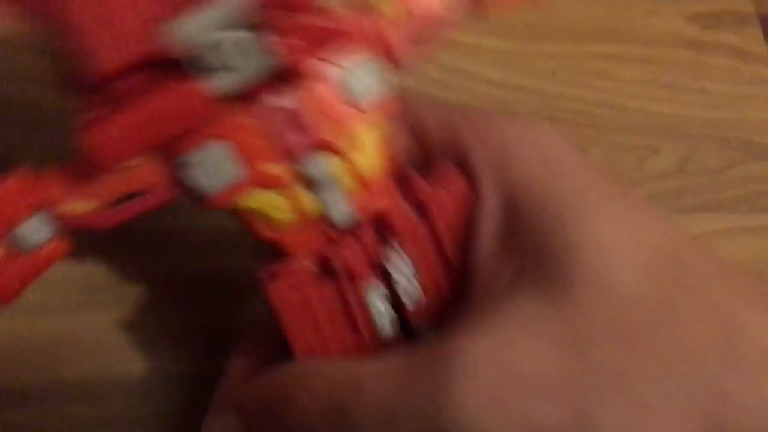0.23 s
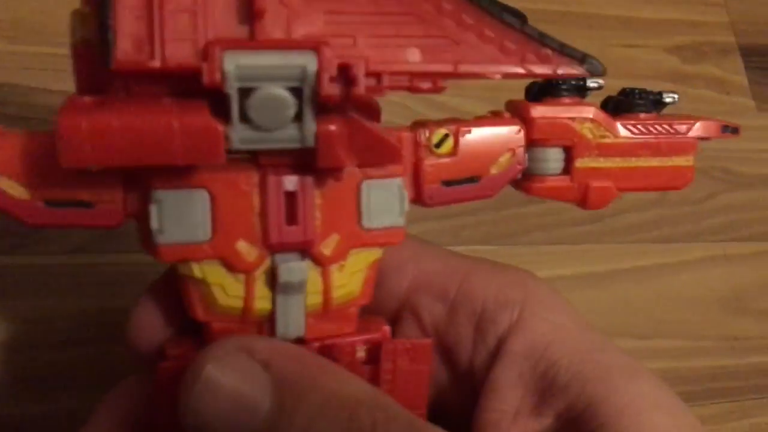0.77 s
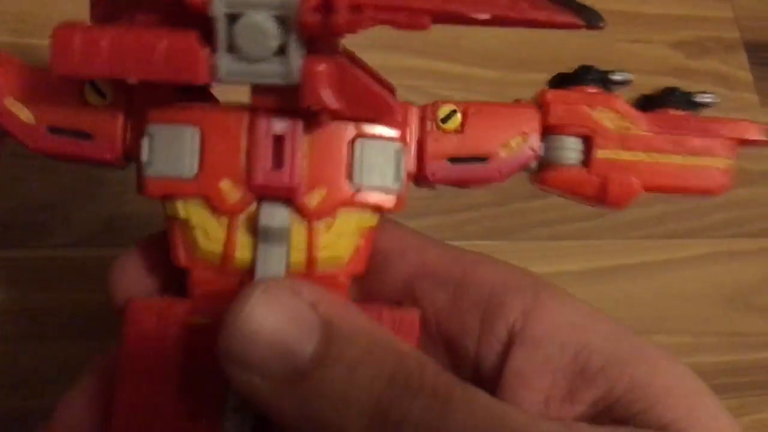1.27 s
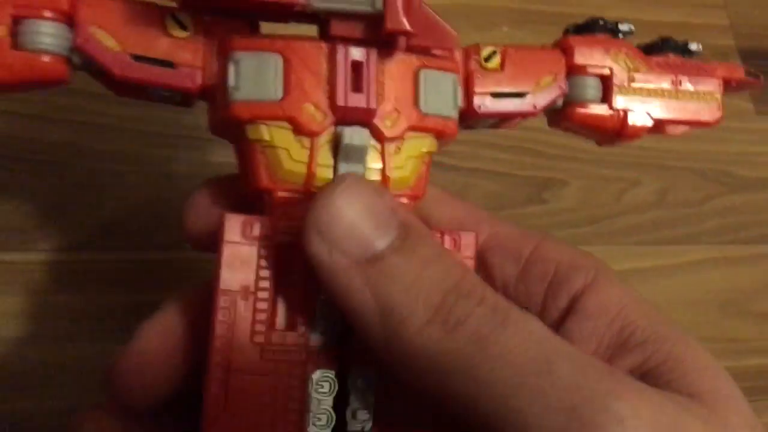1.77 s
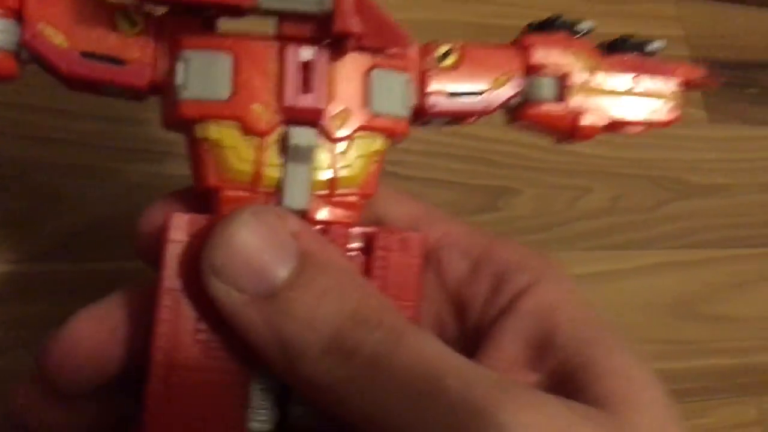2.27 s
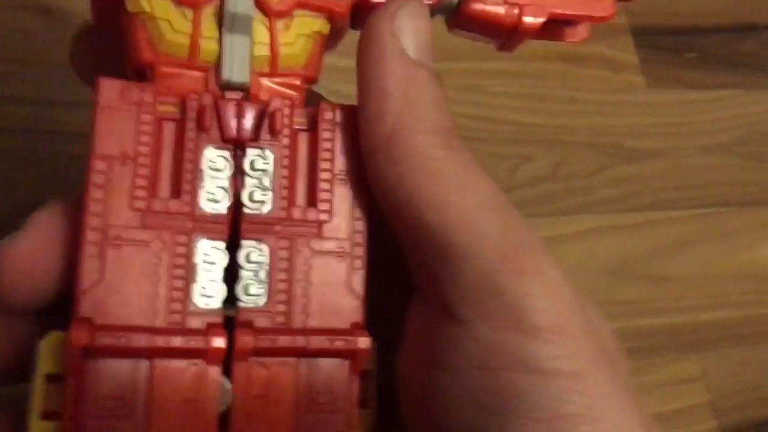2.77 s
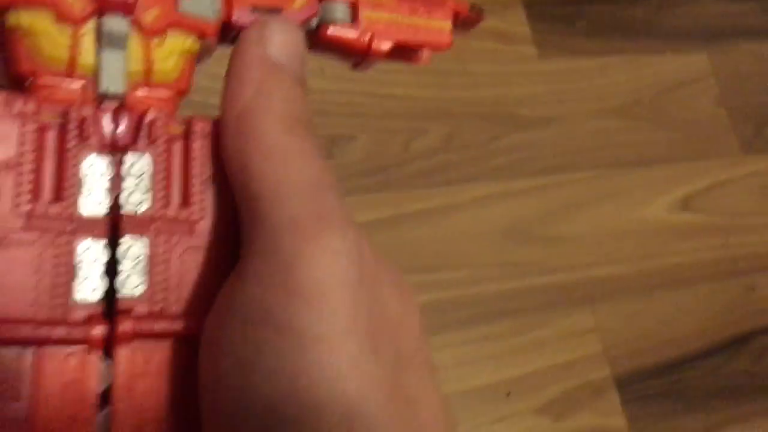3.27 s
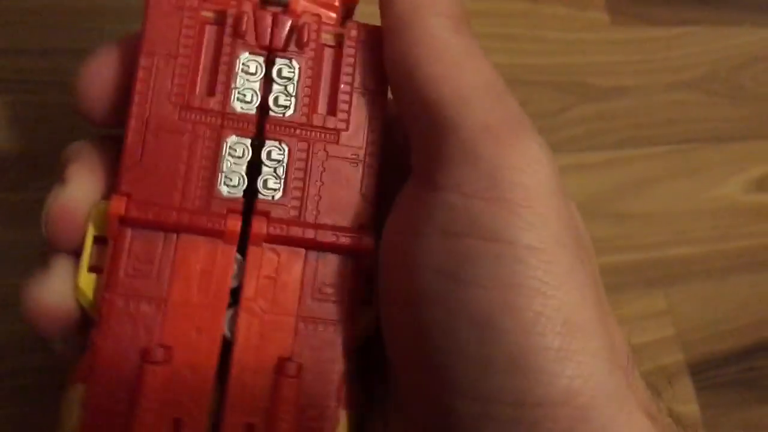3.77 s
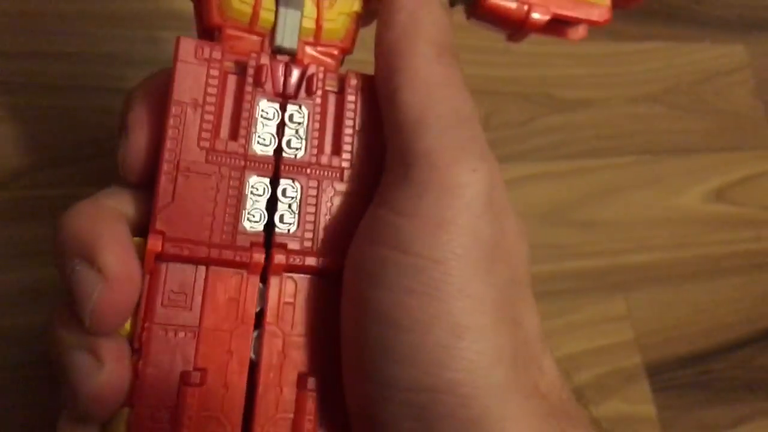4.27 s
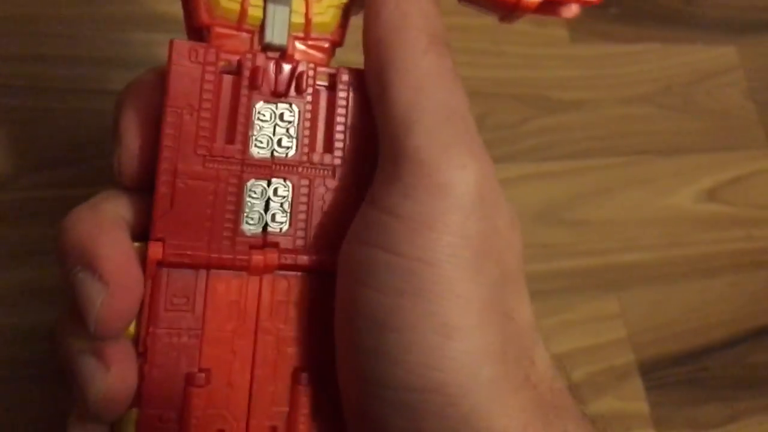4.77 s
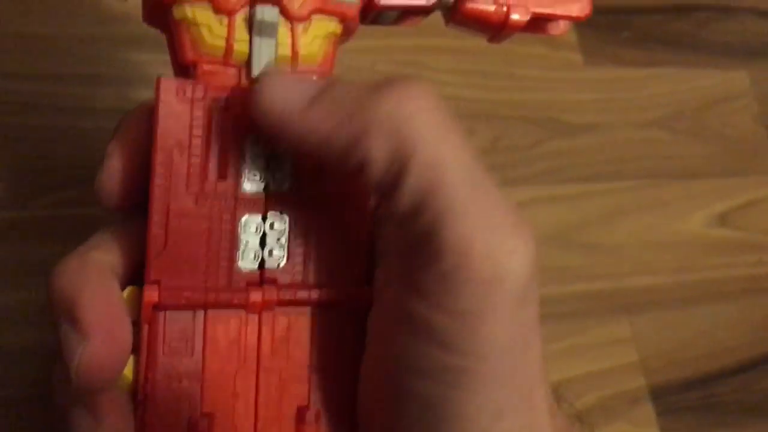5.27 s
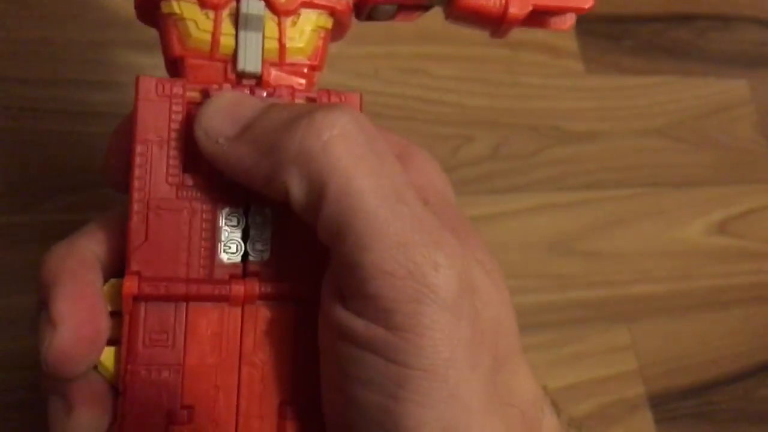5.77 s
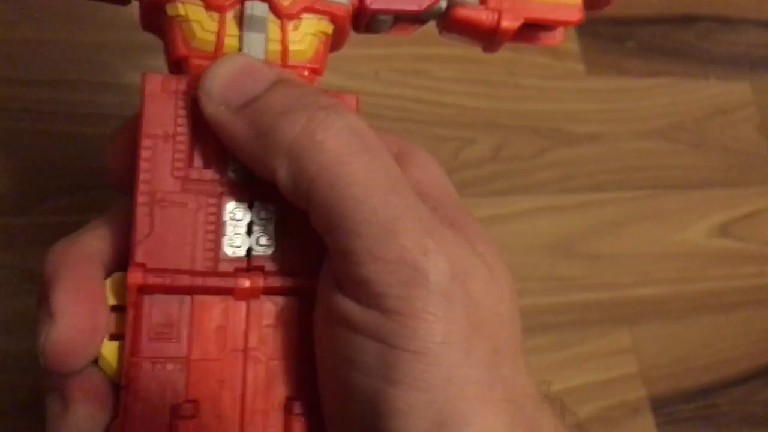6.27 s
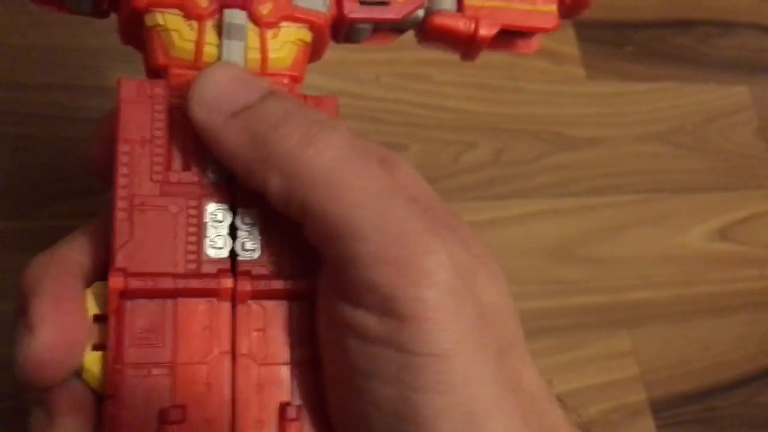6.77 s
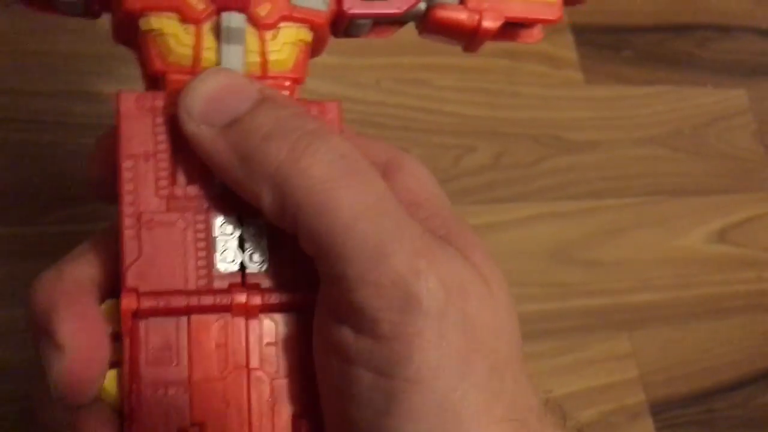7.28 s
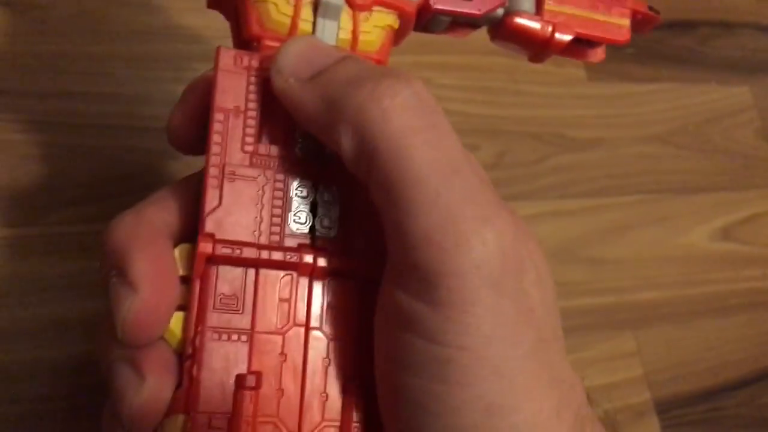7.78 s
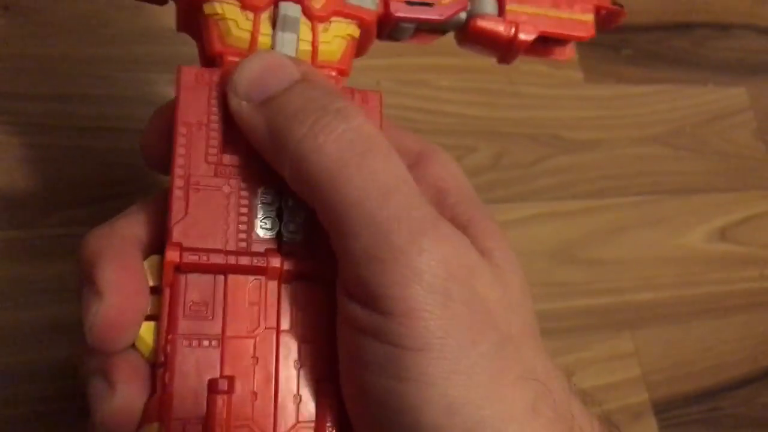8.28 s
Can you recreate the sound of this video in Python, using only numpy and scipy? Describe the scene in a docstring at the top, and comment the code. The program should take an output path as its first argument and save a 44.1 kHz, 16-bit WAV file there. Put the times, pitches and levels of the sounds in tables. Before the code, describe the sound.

Hands fold a hollow plastic toy in a quiet room, with light clicks, rubbing fingers and several loud, sharp snaps as panels lock.

```python
"""Quiet room: hands fold and press the panels of a hollow plastic toy close to a small microphone.
Catches click and snap as short slips ring damped modes; dull knocks, at listed times, are decaying sines.
Fingers rub the shell (grainy noise through the same modes); at first the toy drags over a wooden table.
Low room tone runs throughout; faint hiss comes in, and the room tail swells, briefly at the sharpest snaps."""
import sys
import numpy as np
from scipy import signal
from scipy.fft import rfft, irfft
from scipy.io import wavfile
from scipy.ndimage import uniform_filter1d

SR = 44100
rng = np.random.default_rng(int(sys.argv[2]) if len(sys.argv) > 2 else 0)


def put_to_file(sound):
    """Save the sound as 16-bit audio at rate SR, in the file named by the first command-line argument."""
    columns = np.atleast_2d(sound).T  # one column per channel
    safe = np.clip(columns, -1, 1)
    whole_steps = np.round(safe * 32767)
    wavfile.write(sys.argv[1], SR, whole_steps.astype(np.int16))


N = 376288

# Modes of the plastic shell and its ribs. Each row: frequency in Hz, width in Hz, relative level in dB.
SHELL_MODES = [(3180, 100, -7), (4480, 120, 0), (5716, 360, 0), (9060, 37, -16), (10400, 400, -9),
               (12560, 73, -3), (13800, 100, -12.5), (13900, 110, -7), (16850, 1400, -3.5),
               (17400, 510, -9)]


def gain_of(db):
    """Amplitude factor of a level in dB."""
    return 10 ** (np.asarray(db) / 20)


def evened(x):
    """Scale to rms 1."""
    return x / np.sqrt(np.mean(x ** 2) + 1e-20)


def add(mix, start_s, sound):
    """Mix a sound in place, cut at the end of the mix."""
    part = mix[round(start_s * SR):][:len(sound)]
    part += sound[:len(part)]


def modes(table, hz):
    """Response of damped resonators side by side, with alternating sign."""
    response = 0
    for k, (mode_hz, width_hz, db) in enumerate(table):
        damping = 1j * hz * width_hz
        response = response + (-1) ** k * gain_of(db) * damping / (mode_hz ** 2 - hz ** 2 + damping)
    return response


def colour(points, hz):
    """Spectral gain, interpolated in dB over log frequency."""
    point_hz, db = np.transpose(points)
    return gain_of(np.interp(np.log(hz + 1), np.log(point_hz), db))


def noise(response):
    """Steady noise of rms 1 with the given response."""
    return evened(irfft(rfft(rng.standard_normal(N)) * response, N))


def band(x, lo_hz, hi_hz):
    """Third-order Butterworth bandpass."""
    return signal.sosfilt(signal.butter(3, [lo_hz, hi_hz], "bandpass", fs=SR, output="sos"), x)


def rings(drive, hollow_hz, width_hz, spot):
    """A drive rings the hollow, the shell and its top band; each spot retunes and reweights the shell modes."""
    hz, spectrum = np.fft.rfftfreq(len(drive), 1 / SR), rfft(drive)
    hollow_modes = [(hollow_hz, width_hz, 0), (1.35 * hollow_hz, 300, -10),
                    (0.62 * hollow_hz, 400, -14), (2.1 * hollow_hz, 400, -21)]
    shell_modes = [(mode_hz * (1 + 0.025 * shift), width, db + 0.99 * shift)
                   for (mode_hz, width, db), shift in zip(SHELL_MODES, spot)]
    hollow = irfft(spectrum * modes(hollow_modes, hz))
    shell = irfft(spectrum * (modes(shell_modes, hz) + 0.57))  # 0.57: drive heard directly
    return band(hollow, 560, 3100), band(shell, 3200, 7500), band(shell, 7500, 21000)


def click(slip, spot, hollow_db, shell_db, tick_db, hollow_hz):
    """A catch slips in a few sharp spikes, briefer if soft; loose parts chatter on, more after a hard jolt."""
    t, levels_db = np.arange(len(slip)) / SR, (hollow_db, shell_db, tick_db)
    slip_s = 0.00038 * max(5.23 + 0.13 * max(levels_db), 1)
    u = t / slip_s
    spikes = rings(slip * abs(slip) * u * np.exp(-u), hollow_hz, 170, spot)
    chatter_gain = gain_of(-15.5 + 0.16 * max(shell_db, tick_db))
    chatter = slip * chatter_gain * (1 - np.exp(-u)) * np.exp(-t / 0.014)
    # loose parts damp the hollow: wider mode, 6 dB less chatter
    chatter_rings = rings(chatter, hollow_hz, 900, 0 * spot) * gain_of([[-6], [0], [0]])
    out = np.zeros(len(slip))
    for db, part in zip(levels_db, np.add(spikes, chatter_rings)):
        loudest_rms = np.sqrt(uniform_filter1d(part ** 2, size=130).max())  # over 3 ms
        out += gain_of(db) * part / loudest_rms
    return out


def clicks():
    """Catches and hinges ring the toy; dull knocks are decaying sines, the higher the shorter."""
    # Catches and hinges. Each row: time in seconds, hollow ring in dB, shell ring in dB, tick in dB,
    # pitch of the hollow in Hz.
    click_rows = [(0.031, -36.5, -38, -51, 1540), (.048, -47, -60, -57, 1570), (.065, -48, -49, -58, 1500),
                  (.086, -49, -48, -58, 1440), (0.1152, -46.5, -35.5, -47, 1500),
                  (0.1684, -40, -33, -52, 1630), (.175, -47, -32.5, -43, 1970),
                  (0.223, -55, -39, -49, 2020), (0.2473, -41.5, -27.5, -29.5, 1820),
                  (0.2532, -40, -35, -50, 2240), (.28, -58, -51, -54, 1580),
                  (0.2935, -27, -18.5, -23.5, 1950), (0.3182, -46, -30.5, -50, 1790),
                  (.345, -50, -38, -56, 1500), (0.378, -62, -49, -63, 1690), (.68, -48.5, -34, -35, 1850),
                  (.771, -32.5, -20.5, -20, 1730), (0.7873, -34.5, -18, -30, 2270),
                  (.795, -37.5, -28.5, -46, 1450), (0.8531, -43.5, -31.5, -41, 1950),
                  (0.95, -62, -50.5, -50, 1590), (1.4855, -41.5, -60, -59, 2030),
                  (1.5864, -49, -34, -36.5, 1550), (1.6641, -41, -42, -37, 1920),
                  (1.6843, -36, -51, -56, 2400), (1.704, -35, -37.5, -46, 1850),
                  (1.7207, -32, -32.5, -52, 1490), (1.9466, -54.5, -45, -50, 1950),
                  (2.198, -61, -48.5, -55, 1900), (2.226, -60, -55, -58, 1600),
                  (2.835, -58, -43, -58, 1580), (3.068, -51.5, -57, -63, 1550),
                  (3.1711, -33, -30.5, -43, 1680), (3.2051, -36.5, -39, -41, 955),
                  (3.2209, -15, -14, -14, 1645), (3.4347, -48.5, -63, -59, 1560),
                  (3.5707, -46, -46.5, -45, 1860), (3.702, -40, -52, -62, 1426),
                  (3.7441, -41.5, -51, -61, 1700), (3.7915, -39.5, -67, -67, 1660),
                  (3.9219, -40.5, -31, -47, 1670), (3.9276, -35.5, -32, -45, 1850),
                  (3.941, -38, -27.5, -45, 1740), (3.9543, -45, -33, -41, 1700),
                  (3.9728, -39.5, -24, -47, 1430), (4.029, -29.5, -21.5, -30, 1585),
                  (4.037, -48.5, -34, -41, 1750), (4.231, -11, -15.5, -12.5, 1673),
                  (4.2391, -43, -23, -18, 1680), (4.247, -41.5, -35, -24.5, 1750),
                  (4.4853, -53, -65, -57, 1680), (4.6182, -12.5, -8.5, -10.5, 1242),
                  (4.6572, -21.5, -35, -54, 1870), (5.275, -54.5, -63.5, -68, 1600),
                  (5.338, -56, -56.5, -70, 1490), (5.489, -47.5, -59.5, -65, 1590),
                  (5.6656, -51.5, -58.5, -58, 1386), (6.208, -62.5, -75.5, -75, 1300),
                  (6.281, -28.5, -32, -30, 1273), (6.352, -62, -63.5, -61, 1300),
                  (6.421, -56.5, -62, -67.5, 1300), (6.4424, -51, -62, -67, 2090),
                  (6.515, -52, -79.5, -78, 1600), (6.6198, -43.5, -54.5, -55.5, 1475),
                  (6.665, -48, -46, -55.5, 1500), (6.681, -21, -19.5, -20, 1520),
                  (6.6844, -30, -22, -35, 2000), (6.6945, -35.5, -27, -22, 1640),
                  (6.7016, -45, -34, -26.5, 1840), (6.7823, -41, -33, -46, 1940),
                  (6.833, -34, -27.5, -25, 1340), (6.921, -55.5, -64.5, -72.5, 1710),
                  (6.9432, -29.5, -36.5, -42.5, 1688), (7.0657, -72, -53.5, -53, 1990),
                  (7.1437, -64.5, -54.5, -50.5, 1924), (7.3221, -37.5, -46.5, -62.5, 1350),
                  (7.339, -44.5, -56, -44, 2210), (7.3491, -11, -14.5, -8, 1607),
                  (7.3648, -26, -27.5, -43.5, 2163), (7.9486, -27.5, -21, -15, 1332),
                  (7.9593, -35, -25.5, -29.5, 2080), (7.965, -43.5, -38, -27.5, 1759),
                  (8.362, -50.5, -63.5, -70.5, 1750)]
    # Dull knocks. Each row: start in seconds, level in dB, pitch in Hz.
    thump_rows = [(.772, -31.5, 515), (0.854, -38.5, 970), (1.78, -44.5, 720), (3.172, -41, 564),
                  (3.222, -37.5, 206), (3.58, -45, 504), (4.231, -29, 344), (4.234, -39, 92),
                  (4.619, -28.5, 342), (4.657, -32.5, 190.4), (5.43, -47.5, 170.3), (5.71, -49, 180),
                  (6.683, -32, 348), (6.785, -43.5, 537), (7.354, -32, 363), (7.355, -37.5, 140),
                  (7.949, -39.5, 300)]
    out, t = np.zeros(N), np.arange(3000) / SR
    for s, *how in click_rows:
        slip, spot = rng.standard_normal(4096), rng.standard_normal(len(SHELL_MODES))
        add(out, s - 0.0007, click(slip, spot, *how))
    for s, db, hz in thump_rows:
        add(out, s, gain_of(db) * np.sin(2 * np.pi * hz * t) * np.exp(-t * hz / 1.9))
    return out


def wander(x, draw):
    """Colour drifts as the finger crosses ribs and panels: spectral patches lifted and lowered, 2 dB rms."""
    z = signal.stft(x, nperseg=256)[2]
    patches = uniform_filter1d(np.resize(draw, z.shape), size=4, axis=0)
    patches = evened(uniform_filter1d(patches, size=14, axis=1))
    return signal.istft(z * gain_of(2 * patches), nperseg=256)[1][:len(x)]


def rubbing():
    """Skin and panels stick and slip on the ribbed shell: grainy noise with snags rings hollow and shell."""
    # Strokes on plastic. Each row: start in seconds, length in seconds (sound ends by 0.37),
    # hollow ring in dB, shell ring in dB.
    stroke_rows = [(0.0, 0.086, -48, -51.5), (0.099, 0.16, -62.5, -59.5), (.269, 0.067, -45, -43.5),
                   (0.294, .12, -54, -52), (0.409, .2, -68, -60.5), (0.613, 0.22, -69.5, -62.5),
                   (0.794, 0.093, -58, -69), (1.108, .24, -76, -65.5), (1.185, 0.13, -57, -57.5),
                   (1.312, .14, -58, -55), (1.684, 0.068, -55, -51.5), (1.77, 0.04, -48.5, -50.5),
                   (1.794, 0.32, -72, -65), (2.133, 0.148, -70, -65), (2.29, 0.19, -70, -63),
                   (2.456, 0.047, -66, -52.5), (2.505, .12, -78, -69), (2.629, .13, -67, -57.5),
                   (2.751, 0.13, -64, -51), (2.884, 0.9, -68, -61.5), (3.54, 0.14, -62.5, -74),
                   (3.689, 0.084, -54.5, -55.5), (3.77, 0.19, -66.5, -62.5), (3.898, .079, -49.5, -47),
                   (3.995, 0.28, -64.5, -60), (4.278, .13, -66.5, -74), (4.662, 0.021, -49, -37),
                   (5.323, 0.31, -74.5, -67), (5.624, 0.08, -57, -61.5), (6.043, 0.086, -66, -56.5),
                   (6.295, 0.18, -74.5, -77), (6.726, 0.096, -58, -58.5), (6.847, 0.087, -76, -71)]
    snags_per_s, snag_size = 29, 3
    rustle_db = 1.6  # top band against the shell ring
    fade_db = -3.5  # slope over a stroke
    out = np.zeros(N)
    for s, length_s, hollow_db, shell_db in stroke_rows:
        rub, rough, spot, chance, patch_draw = rng.standard_normal((5, 16384))
        fine = evened(uniform_filter1d(rough, size=120))
        coarse = evened(uniform_filter1d(rough, size=1500))
        grain = gain_of(3.6 * fine + 0.6 * coarse)
        snags = chance > np.quantile(chance, 1 - snags_per_s / SR)
        grain = grain + snag_size * signal.lfilter([1], [1, -0.97], snags * abs(rough))
        parts = rings(wander(rub * grain, patch_draw), 1500, 490, 2.0 * spot)
        levels_db = (hollow_db, shell_db, shell_db + rustle_db)
        sound = sum(gain_of(db) * evened(part) for db, part in zip(levels_db, parts))
        sound = sound[:round((length_s + 0.02) * SR)]
        fade = gain_of(np.linspace(0, fade_db, len(sound)))
        edges = signal.windows.tukey(len(sound), min(0.05 / length_s, 1))
        add(out, max(s - 0.01, 0), sound * fade * edges)
    return out


def dragging():
    """The toy judders over the table top: spiky noise rings the wood."""
    # Drag level, -120 dB after the last row. Each row: time in seconds, level in dB.
    drag_rows = [(0.0, -39), (0.054, -33.5), (0.13, -65.5)]
    # Modes of the wooden table. Each row: frequency in Hz, width in Hz, relative level in dB.
    table_modes = [(197, 170, 0), (313, 220, -8.5), (690, 30, -10.5), (1495, 400, -11)]
    judder = rng.standard_normal(N) ** 3
    wood = irfft(rfft(judder) * modes(table_modes, np.fft.rfftfreq(N, 1 / SR)), N)
    drag_s, drag_db = np.transpose(drag_rows)
    return evened(wood) * gain_of(np.interp(np.arange(N) / SR, drag_s, drag_db, right=-120))


def room(x):
    """A short diffuse tail: noise, each band dying at its own speed."""
    # Decay of the room. Each row: frequency in Hz, t60 in seconds.
    decay_rows = [(250, 0.25), (1700, 0.23), (4000, 0.26), (14000, 0.13)]
    hz, t, z = signal.stft(rng.standard_normal(SR // 2), SR, nperseg=128)
    decay_hz, t60_s = np.transpose(decay_rows)
    decay = gain_of(-60 * t / np.interp(hz, decay_hz, t60_s)[:, None])
    tail = signal.istft(z * decay, SR, nperseg=128)[1]
    tail *= 1 - np.exp(-np.arange(len(tail)) / SR / 0.0014)  # soft onset
    return signal.fftconvolve(x, tail / np.linalg.norm(tail))[:N]


def swell():
    """Gate from 0 to 1 for a moment at the sharpest snaps, edges smoothed over 14 ms."""
    # Sharpest snaps: time of each in seconds.
    snap_times_s = [3.221, 4.232, 4.618, 7.35, 7.95]
    hold_s = 0.411
    t = np.arange(N) / SR
    gates = [1.0 * ((t > s) & (t < s + hold_s)) for s in snap_times_s]
    return uniform_filter1d(np.max(gates, axis=0), size=600)


def background():
    """Low room tone of slightly lumpy level, and faint hiss gated by the swell."""
    # Spectrum of the room tone. Each row: frequency in Hz, relative level in dB per Hz.
    tone_points = [(12, -53), (20, -9.5), (37, -10.5), (80, -5.5), (208, -19.5), (240, -18), (387, -25),
                   (472, -28.5), (17000, -41)]
    # Spectrum of the hiss. Each row: frequency in Hz, relative level in dB per Hz.
    hiss_points = [(120, 7.5), (260, 9), (900, 0.5), (1700, 0.5), (5000, -4.5), (14000, -4.5),
                   (17200, -4.5)]
    tone_db, hiss_db = -62, -60.5  # hiss level while the gate is open
    hz = np.fft.rfftfreq(N, 1 / SR)
    slow = evened(uniform_filter1d(rng.standard_normal(N), size=3000))
    lumps = evened(gain_of(0.68 * slow))
    tone = gain_of(tone_db) * noise(colour(tone_points, hz)) * lumps
    hiss = gain_of(hiss_db) * noise(colour(hiss_points, hz)) * swell()
    return tone + hiss


def scene():
    """Clicks and drag with their room tail, 11 dB up in the swell; rubbing and background without tail."""
    toy = clicks() + dragging()
    tail = gain_of(-32 + 11 * swell()) * room(toy)
    return (toy + tail + rubbing() + background())[None]


def record(dry):
    """Hard snaps are rounded off; the microphone drops the very top and deepest bass; then the band limit."""
    soft = dry / (1 + (dry / 0.82) ** 4) ** 0.25
    soft = signal.sosfilt(signal.ellip(6, 0.5, 40, 17050, fs=SR, output="sos"), soft)
    soft = signal.sosfilt(signal.butter(2, 36, "highpass", fs=SR, output="sos"), soft)
    band_limit = signal.firwin(511, 19400, window=("kaiser", 9), fs=SR)
    return signal.oaconvolve(soft, band_limit[None], "same")


dry = scene()
out = record(dry)
put_to_file(out)
```